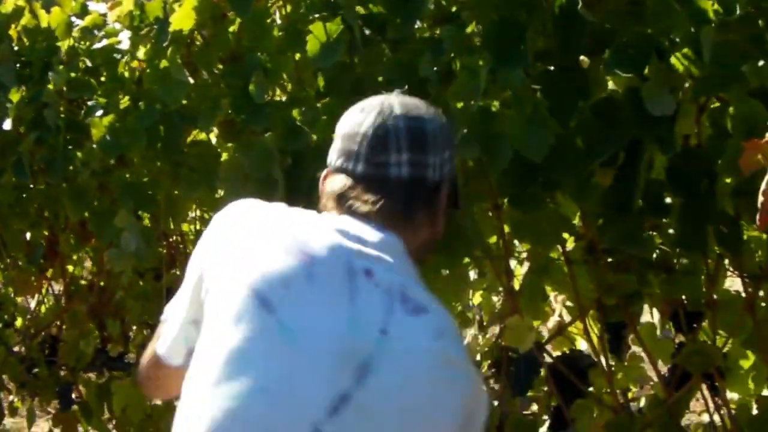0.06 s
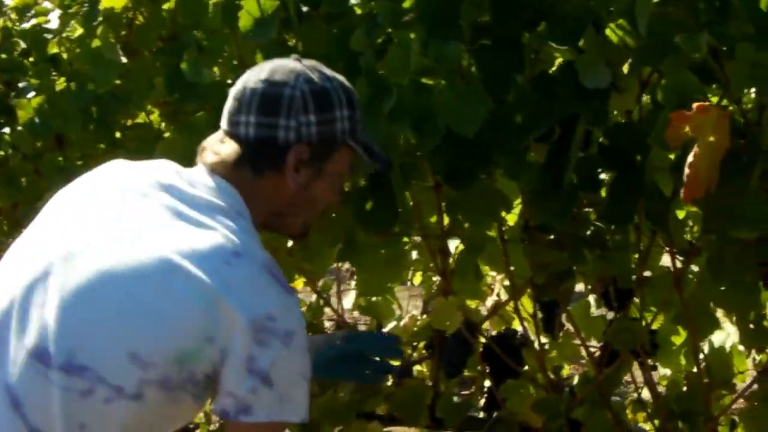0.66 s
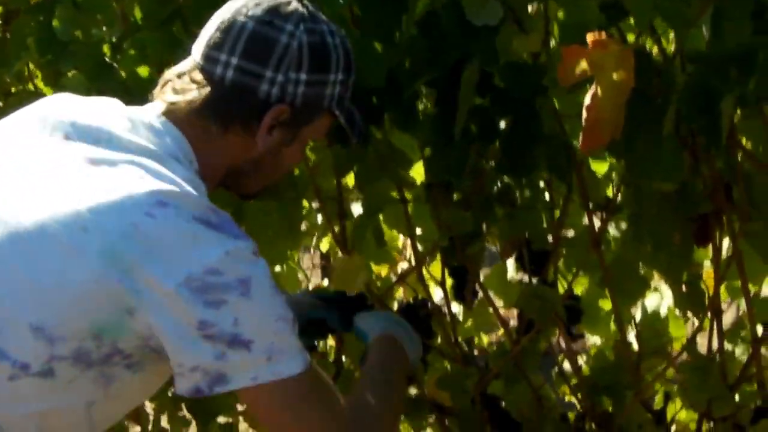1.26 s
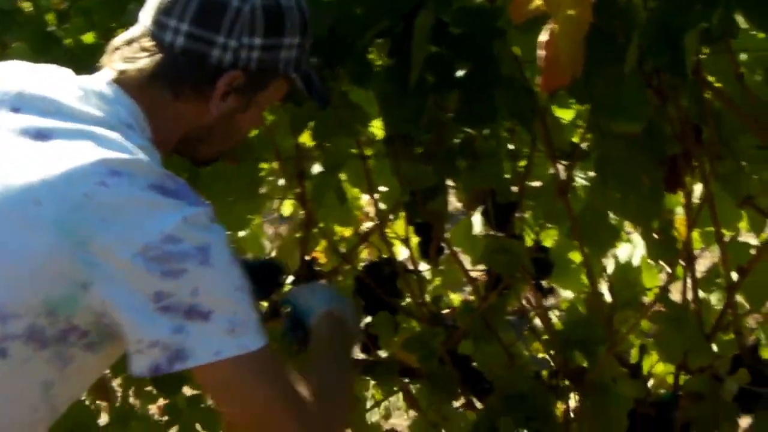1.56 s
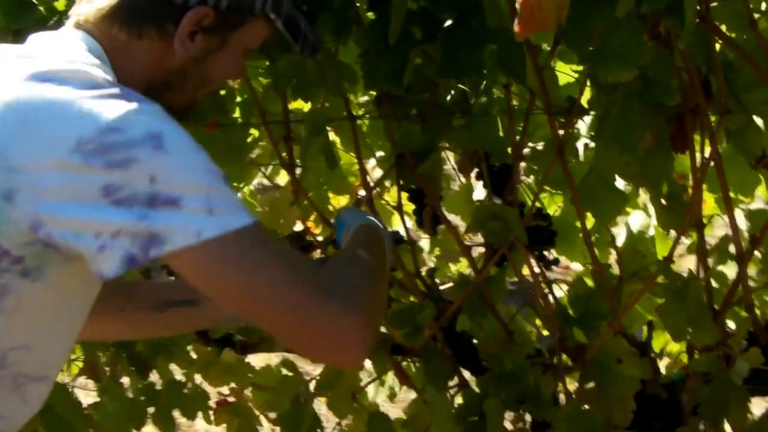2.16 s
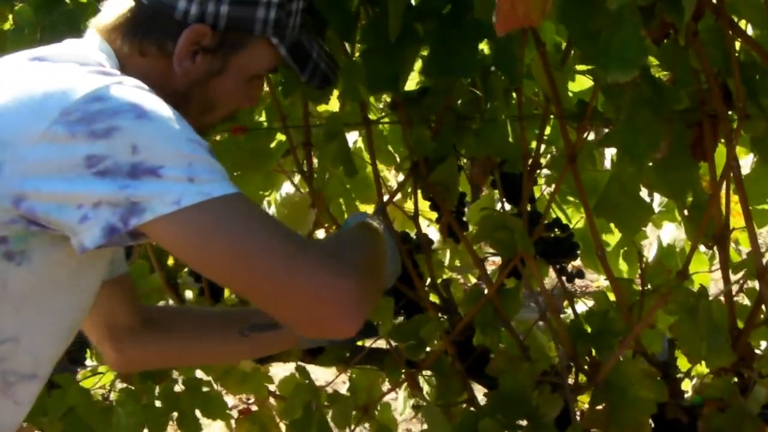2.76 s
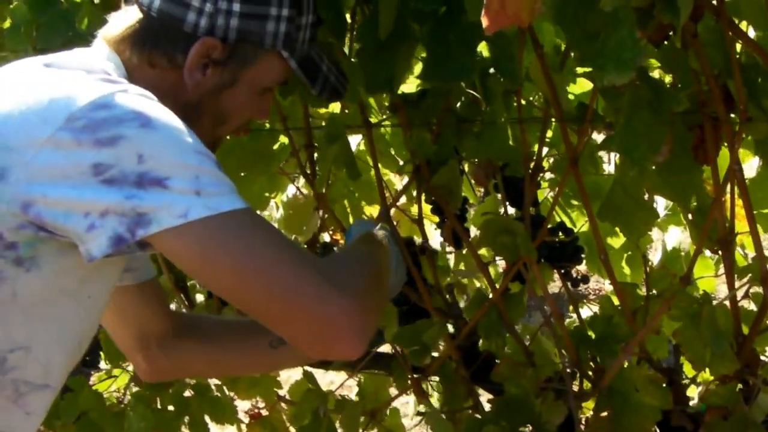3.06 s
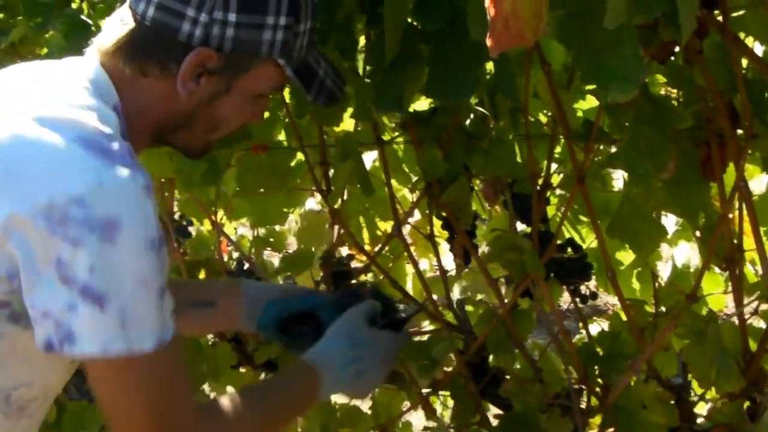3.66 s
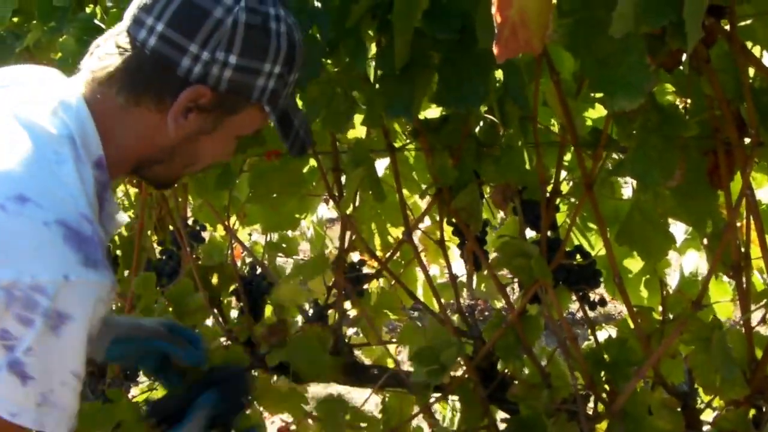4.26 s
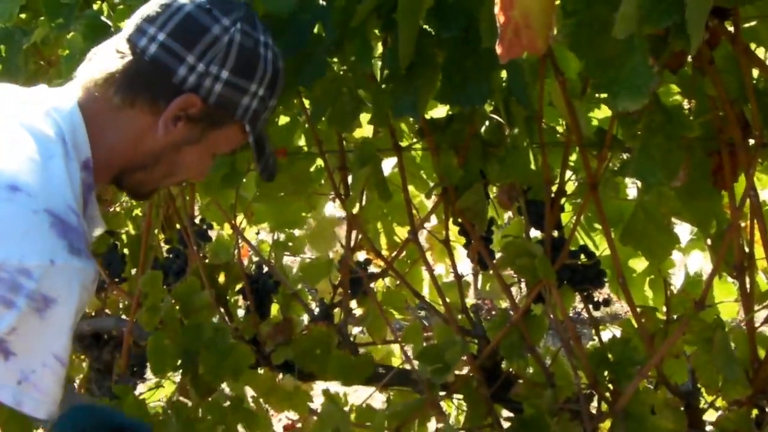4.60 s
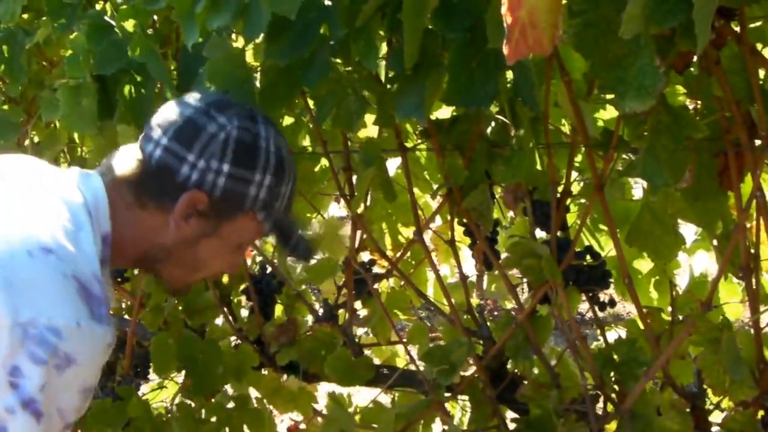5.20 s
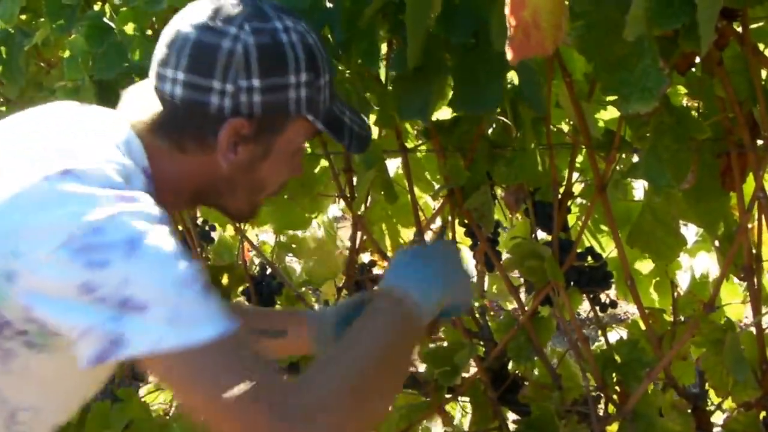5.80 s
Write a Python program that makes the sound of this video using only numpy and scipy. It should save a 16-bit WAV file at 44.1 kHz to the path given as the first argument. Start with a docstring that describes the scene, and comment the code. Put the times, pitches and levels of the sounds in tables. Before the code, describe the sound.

Close, dry rustling of vine leaves and small stem snaps run throughout, over faint outdoor hiss and the low, throbbing hum of a distant idling engine. From about 0.6 to 1 second a plastic bin is set down with a loud, hollow rattle. At 1.5 seconds shears crunch through a stalk, with a soft thud of fruit. Gloves keep swishing through the leaves, and twigs crack. Two sharp snips come at 2.9 and 3.2 seconds, the second the loudest, with a brief metallic ring. Grapes drop softly into the bin around 3.5 seconds, and the rustling is busiest until about 4.5. A faint snip and a snap come at 4.8 seconds, followed by light knocks on the bin and soft fruit thuds near 5.3 and 5.7. The leaves quieten, with a last small swish and snap near 5.9 seconds.

```python
"""Grapes are picked by hand. From the start, gloves rustle the leaves and small stems snap, while a
three-cylinder engine idles some rows away in the faint hiss of open air. Just after half a second a
plastic bin is set down and rattles. From about 1.5 s on, shears crunch through four stalks, their
blades ringing, and fruit drops softly into the bin, which takes a few more light knocks.
Near 6 s the work ends with a last swish and snap."""
import sys
import numpy as np
from scipy import signal
from scipy.fft import rfft, irfft, next_fast_len
from scipy.io import wavfile
from scipy.ndimage import uniform_filter1d, map_coordinates

SR = 44100
rng = np.random.default_rng(int(sys.argv[2]) if len(sys.argv) > 2 else 0)


def transcribe(signal):
    """Save signal, clipped to [-1, 1], as a 16-bit WAV file at the path in sys.argv[1]."""
    frames = np.atleast_2d(signal).T
    limited = np.clip(frames, -1, 1)
    pcm = np.round(limited * 32767).astype(np.int16)
    wavfile.write(sys.argv[1], SR, pcm)


N = 261954
TIME = np.arange(N) / SR
BRIEF = TIME[:SR // 4]  # a quarter second, room for one short sound

# Levels in the tables are relative. A "decay" is the time to fade by 60 dB.
# tone of the open air's hiss and of its far rumble: f/Hz, level/dB
AIR_HISS = [(120, -15), (250, -13), (380, 1), (600, -8.5), (1200, -11.5), (2500, -8.5), (5000, -14),
            (10000, -28), (15000, -31.5)]
AIR_RUMBLE = [(15, -16), (40, -19.5), (90, -3.5), (180, -6.5), (400, -27), (1000, -46)]
# tone of the distant exhaust: f/Hz, level/dB
EXHAUST_TONE = [(10, -52), (30, -41), (52, -14), (78, -1), (94, -1), (105, -6.5), (114, 8), (133, 0.5),
                (158, 0.5), (181, -22), (210, -9.5), (250, -18.5), (350, -25.5), (700, -53), (1500, -67)]
# strength of each cylinder's puff: gain
CYLINDER_GAINS = [0.88, 0.53, 0.89]
# short echo between the vine rows: f/Hz, decay/s
ROW_ECHO = [(200, 0.031), (1500, 0.1), (10000, 0.011)]
# tones of leaves flapping, rubbing and fizzing dryly: f/Hz, level/dB
LEAF_FLAP = [(150, -34), (300, -2), (420, 1.5), (700, -2.5), (1300, 1.5), (1900, -0.5), (3000, 1),
             (6000, -57)]
LEAF_RUB = [(900, -42), (1700, -8), (2400, -1.5), (3200, 1.5), (4500, 0.5), (6500, -1), (9000, -8),
            (15000, -17)]
LEAF_FIZZ = [(3000, -14.5), (6000, -7), (9000, -5), (12000, -6), (15500, -9)]
# hands push through the leaves: t/s, length/s, rub level/dB, fizz over rub/dB, flap over rub/dB
HAND_MOVES = [(0.0, 0.39, -54.5, 6.5, -1), (0.361, 0.53, -47, 0, 0.5), (1.044, .13, -54, 8.5, -1.5),
              (1.425, 0.2, -48, 3.5, -1), (1.718, 0.27, -46, -0.5, -1), (2.034, 0.27, -45, 1, -0.5),
              (2.318, 0.13, -47.5, -4, -0.5), (2.523, 0.2, -45, -2, -11.5), (2.803, 0.56, -51.5, 0, -5.5),
              (3.44, 0.11, -45.5, -0.5, -7.5), (3.614, 0.351, -41.5, -7.5, -11),
              (4.022, 0.16, -45, -7.5, -13), (4.186, 0.43, -46.5, -4.5, -4), (4.843, 0.34, -54, -6, -0.5),
              (5.24, 0.15, -48, -8.5, -1)]
# a glove or sleeve strokes a leaf: middle t/s, level/dB, length/s, centre f/Hz
LEAF_STROKES = [(.355, -39, .025, 9000), (0.415, -32, 0.037, 1360), (0.771, -29.5, 0.0077, 1360),
                (1.408, -35.5, .015, 3280), (2.048, -31, 0.042, 5730), (2.652, -34, .02, 4560),
                (2.836, -36.5, 0.05, 4640), (2.902, -34.5, 0.025, 4270), (3.218, -36.5, 0.083, 3460),
                (3.424, -36, 0.033, 5900), (3.951, -34.5, .04, 3450), (4.216, -38.5, 0.045, 5000),
                (4.324, -34.5, 0.032, 4000), (4.412, -35.5, 0.039, 4580), (5.373, -46, .03, 5000),
                (5.918, -36, 0.016, 2830)]
# twigs and leaf stems snap: t/s, level/dB, centre f/Hz
STEM_SNAPS = [(.1146, -27, 9050), (.183, -24, 9000), (.275, -27, 1520), (.338, -25, 9400),
              (1.131, -26, 4540), (1.4082, -19.5, 3060), (1.8037, -27, 11000), (2.1241, -24.5, 9500),
              (2.1553, -22.5, 1780), (2.239, -25, 1900), (2.393, -22.5, 1920), (2.5182, -22, 2940),
              (2.609, -21.5, 4160), (2.8218, -18, 6480), (3.037, -21, 6570), (3.478, -22, 2900),
              (3.747, -21, 3300), (4.3922, -20, 7000), (4.5516, -25, 4450), (4.8215, -21.5, 2300),
              (5.8715, -31, 4280), (5.903, -23.5, 2800)]
# the bin is knocked: t/s, level/dB, treble (hardness)/dB, loss per bounce/dB, hollow note level/dB
BIN_KNOCKS = [(0.5773, -25.5, 3, 12, -52), (0.6276, -13, -2, 10, -19), (.662, -15.5, -8, 12.5, -32),
              (0.7288, -28, -1, 17, -37), (0.7843, -14, 21, 25, -49), (0.7873, -5.5, 1, 11, -20.5),
              (.81, -13.5, 7, 2.6, -44), (0.9554, -18.5, 3, 5.5, -24.5), (3.477, -36.5, 0, 5.5, -40),
              (4.946, -28.5, 2.5, 6.5, -45), (5.276, -34.5, -14, 10, -42), (5.684, -40, 2, 14, -45)]
# the notes the bin's walls ring at: f/Hz, width/Hz, level/dB
BIN_WALLS = [(170, 60, -9), (330, 70, -15), (740, 90, -18), (1000, 50, -2), (1275, 95, 3), (1685, 80, 0),
             (2100, 190, 0), (2600, 260, -6), (3500, 400, -8), (4330, 400, -11)]
# tone of plastic scraping on grit: f/Hz, level/dB
GRIT_TONE = [(100, -14), (400, -6), (1000, 4), (2000, 0.5), (4000, -1.5), (8000, -12.5), (10500, -16),
             (15000, -26)]
# fruit lands: t/s, level/dB, f/Hz
FRUIT_DROPS = [(1.408, -39, 563), (1.528, -26, 525), (2.158, -33.5, 518), (3.228, -27, 431),
               (3.474, -22, 495), (3.582, -24.5, 496), (4.459, -37, 400), (5.307, -27, 470),
               (5.354, -34, 418), (5.682, -31, 580)]
# the shears cut: t/s, crunch level/dB, crunch decay/s, ring level/dB, wait until the blades meet/s
SHEAR_CUTS = [(1.5248, -16, 0.1, -20.5, .006), (2.8954, -9, 0.025, -19, 0.0012),
              (3.2239, -10, 0.03, -4.5, .0033), (4.821, -25.5, .04, -27, .003)]
# tone of a breaking stalk: f/Hz, level/dB
STALK_TONE = [(120, -30), (300, -9), (500, -3.5), (1200, -5.5), (2600, 0), (5000, -5), (10000, -6),
              (15000, -14)]
# the notes the steel blades ring at: f/Hz, width/Hz, level/dB
BLADE_NOTES = [(650, 450, -14), (2150, 350, -7), (3330, 480, 0), (6160, 700, -22)]
# stereo width of the picking: f/Hz, side over mid/dB
STEREO_WIDTH = [(100, -11), (300, -17), (1000, -16), (2200, -14), (4500, -6.5), (9000, -3.9), (15000, -2.8)]
# stereo balance: f/Hz, left over right/dB
STEREO_BALANCE = [(100, -2.6), (500, -1.9), (1200, -1.2), (2500, -1.5), (5000, -.8), (9000, 1.3),
                  (14000, .4)]

FIRING_HZ = 26.2  # exhaust puffs per second
ATTACK_S, RELEASE_S = 0.085, 0.032  # the hand enters the leaves; they settle behind it
STIR_DB, STIR_FIZZ_DB, STIR_FLAP_DB = -60, 2.5, -6  # the vine's own rub; fizz and flap over that rub
GRIP_DB, SLIP_DB = .8, 1.25  # the grip on the leaves tightens slowly and slips quickly
SWISH_OCTAVES, SWISH_AT_HZ, SWISH_WIDENS = 1, 3000, 0.57  # higher strokes make a wider band of noise
TICKS_PER_S, TICK_OVER_FIZZ_DB, TICK_SPREAD_DB, TICK_HZ, TICK_OCTAVES = 3.7, 18.5, -0.5, 8000, 0.44
HOLLOW_HZ = 490.3  # the note of the bin's air and floor
REBOUND_S, KNOCK_T60_S, REBOUND_T60_S = .0102, 0.055, 0.095  # bounces scrape longer than the first blow
BLADE_T60_S, BLADE_BOUNCE_S, BLADE_LOSS_DB = 0.04, 0.0049, 6  # the blades chatter before they rest
NOTCH_HZ, TOP_HZ = 7950, 15800


def amp(db):
    """Turn decibels into a gain."""
    return 10 ** (np.asarray(db) / 20)


def unit(x):
    """Scale x to an average (rms) level of 1."""
    return x / np.sqrt(np.mean(x ** 2) + 1e-20)


def along(points, hz):
    """Read between the rows of an (f/Hz, value) table, on a log frequency scale."""
    freqs, values = np.transpose(points)
    return np.interp(np.log(hz + 1), np.log(freqs), values)


def fade(t60):
    """A fade of 60 dB in t60 seconds."""
    return amp(-60 * BRIEF / t60)


def wobble(rate):
    """A smooth curve through `rate` random points a second."""
    return map_coordinates(rng.standard_normal(int(N * rate / SR) + 4), [TIME * rate])


def filtered(x, response):
    """Multiply each frequency in x by response(hz)."""
    n = x.shape[-1]
    padded = 2 * next_fast_len(n // 2 + SR // 8)
    return irfft(rfft(x, padded) * response(np.fft.rfftfreq(padded, 1 / SR)), padded)[..., :n]


def causal(db):
    """A filter with these gains that rings only after a hit, never before (minimum phase)."""
    cepstrum = irfft(np.log(amp(db)))
    half = len(cepstrum) // 2
    cepstrum[1:half] *= 2
    cepstrum[half + 1:] = 0
    return np.exp(rfft(cepstrum))


def coloured(x, tone):
    """Give x the tone of an (f/Hz, level/dB) table."""
    return filtered(x, lambda hz: causal(along(tone, hz)))


def resonate(x, notes):
    """Let x ring at each (f/Hz, width/Hz, level/dB) note."""
    return filtered(x, lambda f: sum(
        (-1) ** k * amp(db) * 1j * f * width / (hz * hz - f * f + 1j * f * width)
        for k, (hz, width, db) in enumerate(notes)))


def chatter(t60):
    """A dying burst of tiny contacts, even from bass to treble."""
    burst = rng.standard_normal(len(BRIEF)) * fade(t60)
    even = irfft(np.exp(1j * np.angle(rfft(burst))), len(BRIEF))
    return even * fade(2 * t60)


def note(hz, t60):
    """A pure note that builds for a few milliseconds and dies away."""
    return np.sin(2 * np.pi * hz * BRIEF) * fade(t60) * (1 - np.exp(-BRIEF / .005))


def struck(x, t60):
    """Give a hit the same energy as fade(t60)."""
    return unit(x) * np.sqrt(np.mean(fade(t60) ** 2))


def add(track, s, x):
    """Mix x into the track at s seconds."""
    start = max(round(s * SR), 0)
    track[start:start + len(x)] += x[:max(N - start, 0)]


def air():
    """Faint open-air hiss and distant rumble."""
    hiss = unit(coloured(rng.standard_normal(N), AIR_HISS))
    rumble = unit(coloured(rng.standard_normal(N), AIR_RUMBLE))
    return amp(-50.5) * hiss + amp(-52.0) * rumble


def engine(first_firing_s=0.02617):
    """Each firing sends out one puff of exhaust; unequal cylinders make the hum throb."""
    index = np.arange(int(N / SR * FIRING_HZ))
    time_jitter, size_jitter = rng.standard_normal((len(index), 2)).T
    times = first_firing_s + index / FIRING_HZ + .00007 * time_jitter
    sizes = np.resize(CYLINDER_GAINS, len(index)) * amp(.4 * size_jitter)
    puffs = np.bincount(np.round(times * SR).astype(int), sizes, N)[:N]
    return amp(-43.0) * unit(coloured(puffs, EXHAUST_TONE))


def row_echo(x):
    """Sound scatters between the vine rows and leaves a short, blurred tail."""
    hz, t, noise = signal.stft(rng.standard_normal(len(BRIEF)), SR, nperseg=256)
    decay = amp(-60 * t / along(ROW_ECHO, hz)[:, None])
    tail = signal.istft(noise * decay, SR, nperseg=256)[1]
    return signal.fftconvolve(x, tail / np.linalg.norm(tail))[:N]


def leaf_gains():
    """How strong rub, fizz and flap are over time: each hand move adds to the vine's own stirring."""
    def power(db, fizz_db, flap_db):
        return amp([[db], [db + fizz_db], [db + flap_db]]) ** 2

    total = power(STIR_DB, STIR_FIZZ_DB, STIR_FLAP_DB)
    for s, length, *levels in HAND_MOVES:
        swell = np.interp(TIME, [s - ATTACK_S, s, s + length, s + length + RELEASE_S], [0, 1, 1, 0])
        total = total + power(*levels) * swell ** 2
    return np.sqrt(total)


def crinkle(tone, per_s, pitch_hz, spread_db, smooth):
    """Leaves buckle in tiny dry clicks, each a cycle or two at its own pitch, over smooth rubbing."""
    chance = rng.random((int(per_s * N / SR), 4))
    start = (chance[:, :1] * N).astype(int)
    hz = np.minimum(pitch_hz * 2 ** (2 * chance[:, 1:2] - 1), SR / 2)
    size = amp(spread_db * np.minimum(-np.log(1 - chance[:, 2:3]), 3.5))  # many small, a few big
    life = .5 + 2 * chance[:, 3:] ** 2  # in cycles
    step = np.arange(SR // 200)
    cycles = hz * step / SR
    decay = np.exp(-cycles / life) / np.sqrt(life) * (1 - step / len(step))
    clicks = size * np.sin(2 * np.pi * cycles) * decay
    buckles = np.bincount((start + step).ravel(), clicks.ravel(), N)[:N]
    return unit(coloured(unit(buckles) + smooth * rng.standard_normal(N), tone))


def patchy(x, depth_db):
    """Different leaves take over from moment to moment, so the tone shifts in patches."""
    spectra = signal.stft(x, nperseg=512)[2]
    patches = uniform_filter1d(rng.standard_normal(spectra.shape), size=11, axis=0)
    patches = uniform_filter1d(patches, size=7, axis=1)
    return signal.istft(spectra * amp(depth_db * unit(patches)), nperseg=512)[1][:N]


def leaves(grip_db):
    """Leaves flap, rub and fizz unevenly as the hands grip and slip."""
    rub_gain, fizz_gain, flap_gain = leaf_gains() * amp(grip_db)
    flap = flap_gain * crinkle(LEAF_FLAP, per_s=250, pitch_hz=1030, spread_db=6.0, smooth=2.8)
    rub = rub_gain * crinkle(LEAF_RUB, per_s=700, pitch_hz=3690, spread_db=3.0, smooth=1)
    fizz = fizz_gain * crinkle(LEAF_FIZZ, per_s=1600, pitch_hz=9300, spread_db=2.5, smooth=1.4)
    return patchy(flap + rub + fizz, depth_db=2.0)


def swishes():
    """A glove or sleeve catches and slips along a leaf: a band of noise swells and fades."""
    out = np.zeros(N)
    middle = BRIEF[-1] / 2
    for s, db, length, centre_hz in LEAF_STROKES:
        octaves = SWISH_OCTAVES * (centre_hz / SWISH_AT_HZ) ** SWISH_WIDENS
        catches = unit(uniform_filter1d(rng.standard_normal(len(BRIEF)), size=90))
        grains = rng.standard_normal(len(BRIEF))
        grains *= amp(3.4 * rng.standard_normal(len(BRIEF)) + 2.55 * catches)
        band = filtered(grains, lambda hz: 1 / (1 + (np.log2((hz + 1) / centre_hz) / octaves) ** 2))
        swell = np.exp(-2 * ((BRIEF - middle) / length) ** 2)
        add(out, s - middle, amp(db) * unit(band) * swell)
    return out


def fine_stems():
    """Fine stems tick at random, louder where dry leaves are busy. Gives rows of t/s, level/dB, f/Hz."""
    count = int(TICKS_PER_S * N / SR)
    time_jitter, level_jitter, pitch_jitter = rng.standard_normal((count, 3)).T
    times = ((np.arange(count) + time_jitter) / TICKS_PER_S) % TIME[-1]
    fizz_db = 20 * np.log10(np.interp(times, TIME, leaf_gains()[1]))
    levels = fizz_db + TICK_OVER_FIZZ_DB + TICK_SPREAD_DB * level_jitter
    pitches = TICK_HZ * 2 ** (TICK_OCTAVES * pitch_jitter)
    return np.transpose([times, levels, pitches])


def snaps(stems):
    """Small stems tear over a few milliseconds, with a ring that stops quickly."""
    out = np.zeros(N)
    for s, db, centre_hz in stems:
        tear = chatter(.028) * (1 - np.exp(-BRIEF / .0015))
        click = resonate(tear, [(centre_hz, 0.61 * centre_hz, 0)])
        softened = filtered(click, lambda hz: 1 / (1 + (hz / (3 * centre_hz)) ** 2))
        add(out, s, amp(db - 11) * struck(softened, 0.051))
    return out


def bin_contact(treble_db, t60):
    """The bin touches the ground once: grit scrapes and the walls ring."""
    corner_hz = 2800 * amp(1.06 * treble_db)  # a soft touch wakes only the low notes
    blow = filtered(chatter(t60), lambda hz: 1 / (1 + 1j * hz / corner_hz) ** 2)
    grit = amp(treble_db - 4.5) * unit(coloured(chatter(t60), GRIT_TONE))
    return struck(unit(resonate(blow, BIN_WALLS)) + grit, t60)


def bin_knocks(contacts=4):
    """Each blow wakes the bin's hollow note, and ever weaker bounces follow at a steady beat."""
    out = np.zeros(N)
    for s, db, treble_db, loss_db, hollow_db in BIN_KNOCKS:
        add(out, s, amp(hollow_db - 3.0) * note(HOLLOW_HZ, t60=.13))
        for k in range(contacts):
            contact = bin_contact(treble_db, REBOUND_T60_S if k else KNOCK_T60_S)
            add(out, s + k * REBOUND_S, amp(db - 3.5 - k * loss_db) * contact)
    return out


def fruit_thuds():
    """Soft fruit squashes with a short scuff and wakes a low, round note."""
    out = np.zeros(N)
    for s, db, pitch_hz in FRUIT_DROPS:
        scuff = resonate(chatter(0.091), [(pitch_hz, 220, 0), (2 * pitch_hz, 250, -10)])
        plop = unit(note(pitch_hz, t60=.075)) + amp(-8) * unit(scuff)
        add(out, s, amp(db - 9.5) * struck(plop, 0.13))
    return out


def blade_ring():
    """The steel blades touch once and ring; each note is filtered twice to stand out more clearly."""
    contact = chatter(BLADE_T60_S / 2)
    ring = sum(resonate(resonate(contact, [(hz, width, 0)]), [(hz, width, db)])
               for hz, width, db in BLADE_NOTES)
    return struck(ring, BLADE_T60_S)


def shears(contacts=3):
    """The stalk crunches, and a moment later the blades meet, ring and bounce."""
    out = np.zeros(N)
    for s, crunch_db, t60, ring_db, closing_s in SHEAR_CUTS:
        crunch = struck(coloured(chatter(t60), STALK_TONE), t60)
        add(out, s, amp(crunch_db - 9.5) * crunch)
        for k in range(contacts):
            ring = amp(ring_db - 9 - k * BLADE_LOSS_DB) * blade_ring()
            add(out, s + closing_s + k * BLADE_BOUNCE_S, ring)
    return out


def picking(grip_db, stems):
    """All the close work, with its echo between the vine rows."""
    near = leaves(grip_db) + swishes() + bin_knocks() + fruit_thuds() + shears() + snaps(stems)
    return near + amp(-15) * row_echo(near)


def scene():
    """Both ears share the mid; the side, mostly treble and open air, sets left and right apart."""
    grip_db = GRIP_DB * wobble(30) + SLIP_DB * wobble(150)
    stems = np.vstack([STEM_SNAPS, fine_stems()])
    mid = picking(grip_db, stems) + air() + engine()
    side = filtered(picking(grip_db, stems), lambda hz: amp(along(STEREO_WIDTH, hz))) + amp(-8) * air()
    left_right = np.array([mid + side, mid - side])
    return filtered(left_right, lambda hz: amp(np.outer([.5, -.5], along(STEREO_BALANCE, hz))))


def record(dry):
    """One narrow band of treble is turned down, and the very highest treble is cut off."""
    notched = filtered(dry, lambda hz: 1 - .9 * np.exp(-((hz - NOTCH_HZ) / 130) ** 2))
    return filtered(notched, lambda hz: hz < TOP_HZ)


dry = scene()
out = record(dry)
transcribe(out)
```